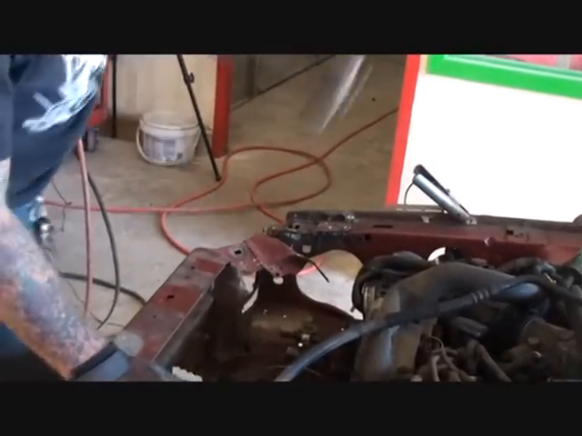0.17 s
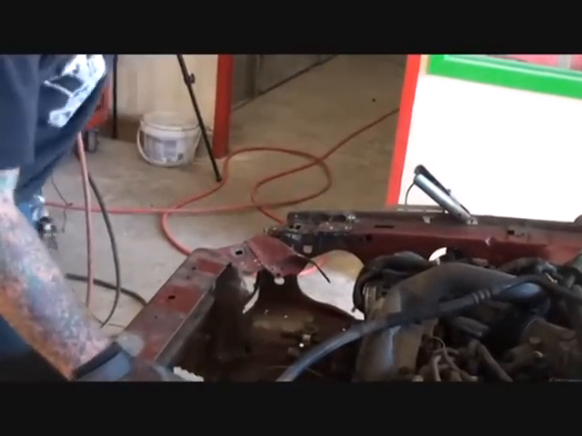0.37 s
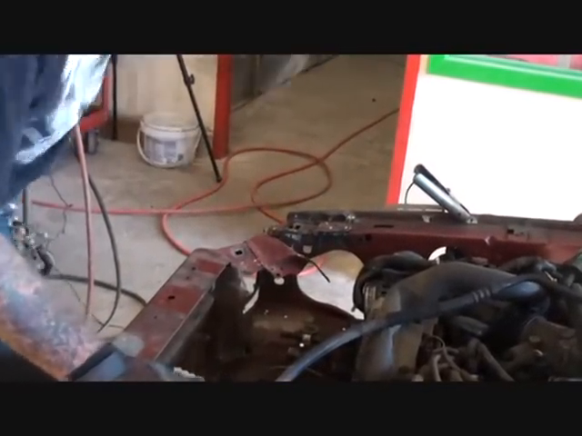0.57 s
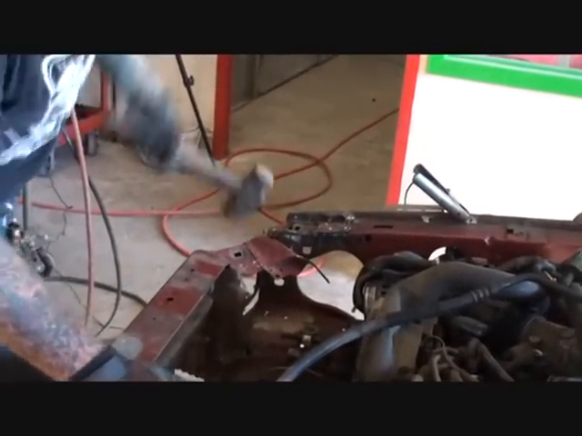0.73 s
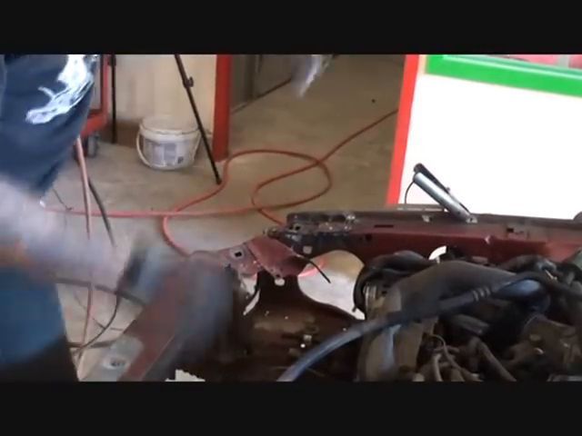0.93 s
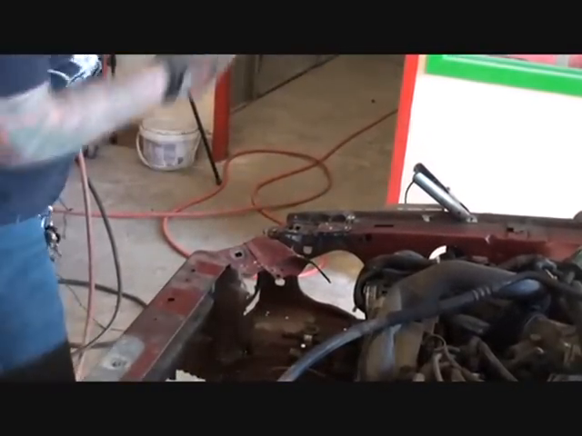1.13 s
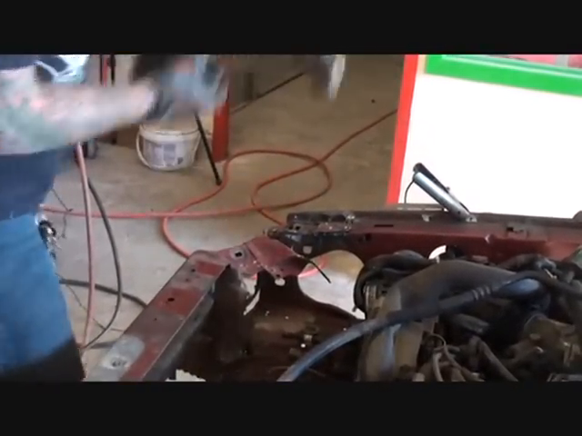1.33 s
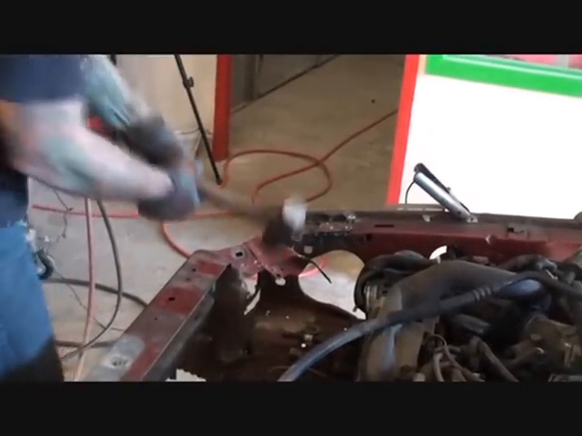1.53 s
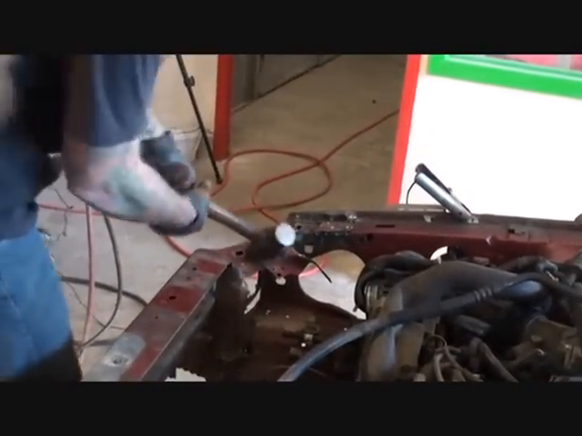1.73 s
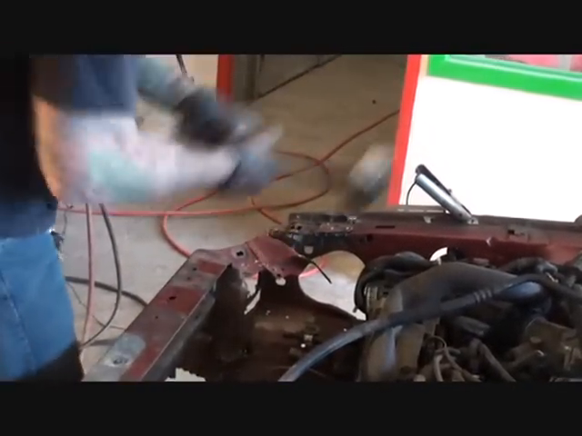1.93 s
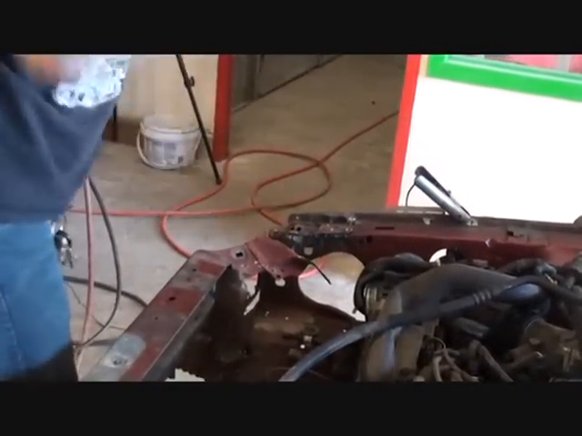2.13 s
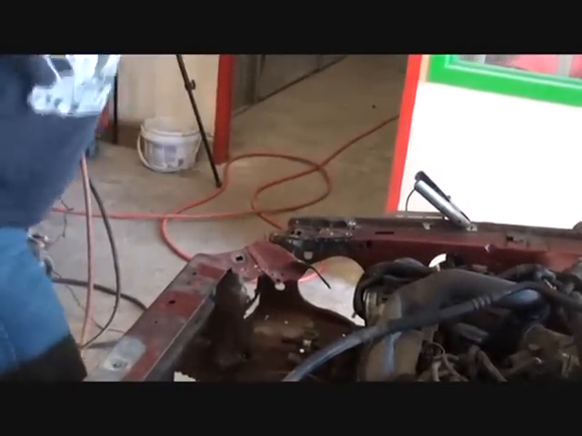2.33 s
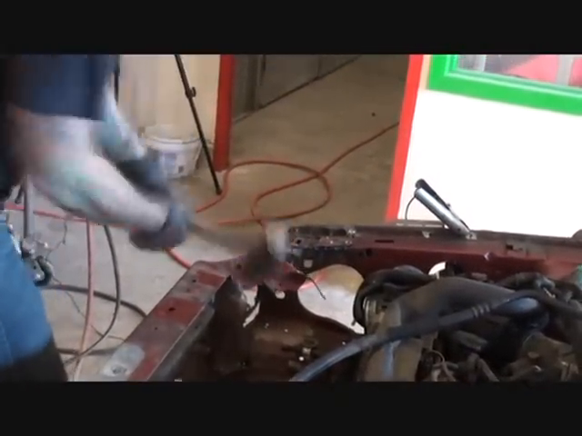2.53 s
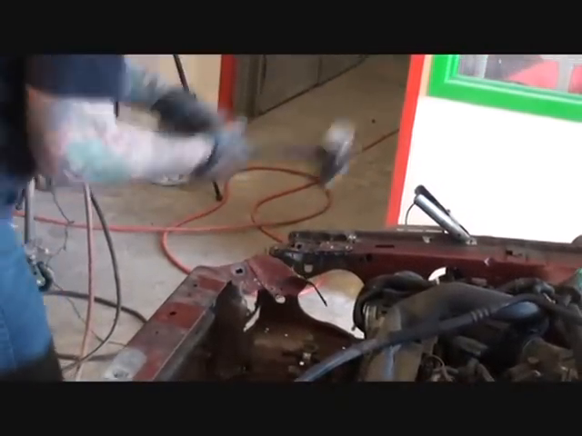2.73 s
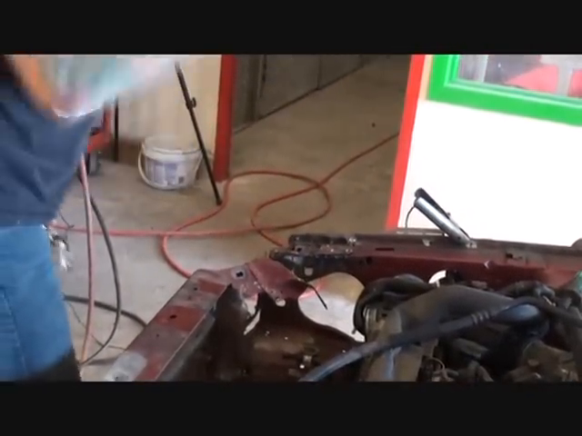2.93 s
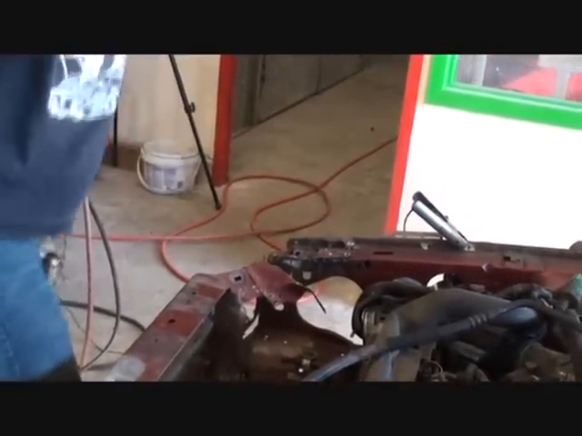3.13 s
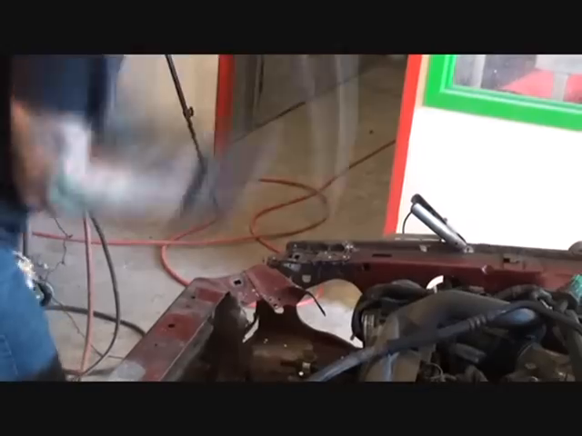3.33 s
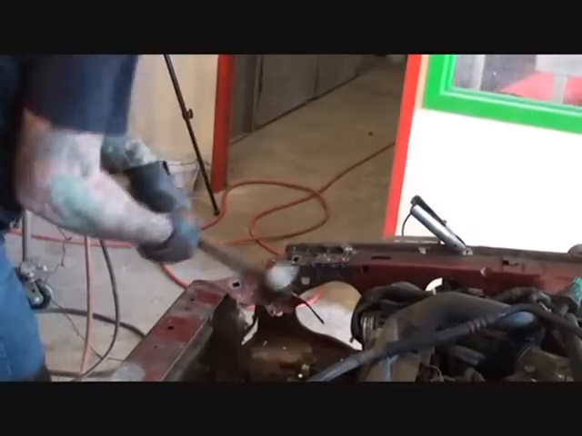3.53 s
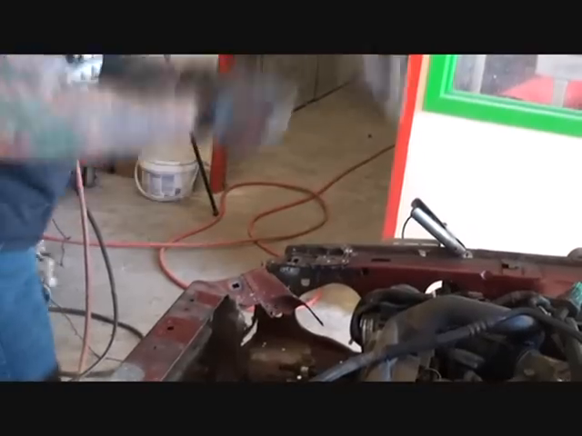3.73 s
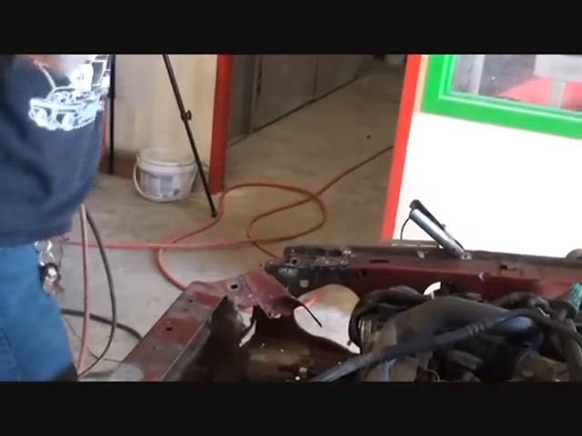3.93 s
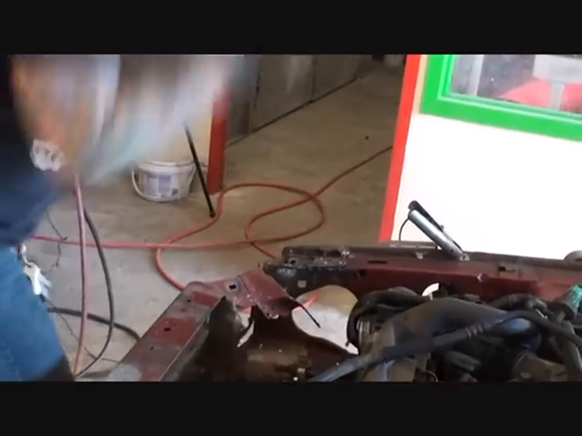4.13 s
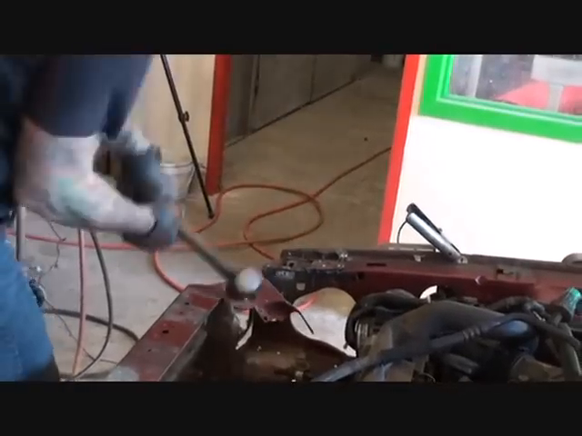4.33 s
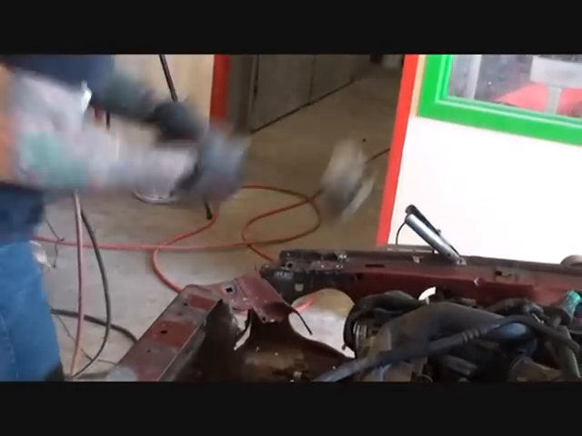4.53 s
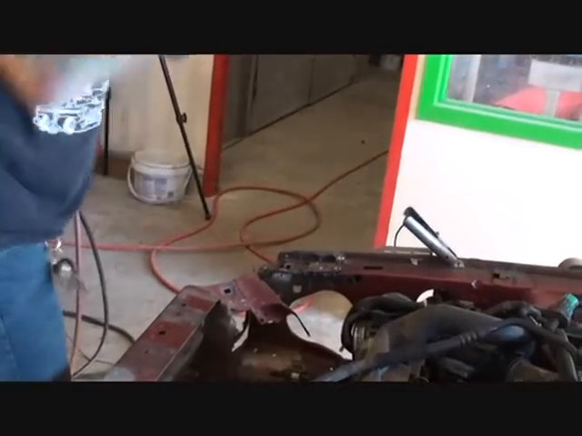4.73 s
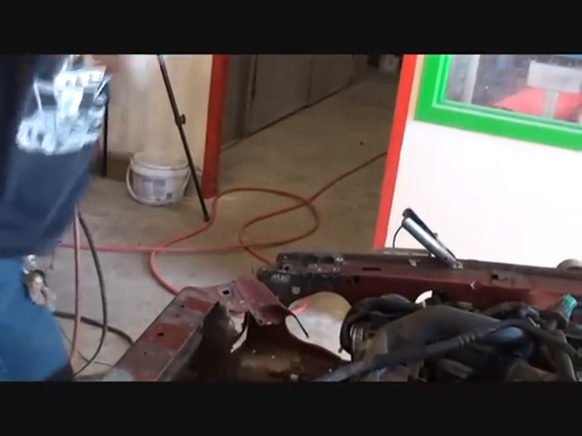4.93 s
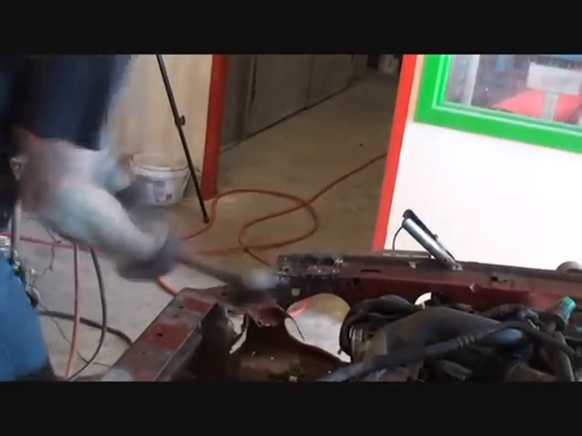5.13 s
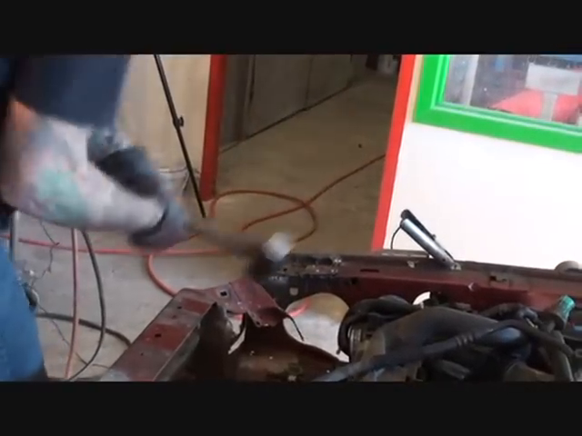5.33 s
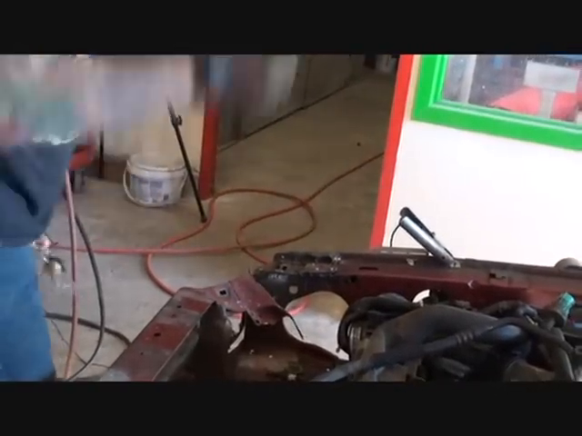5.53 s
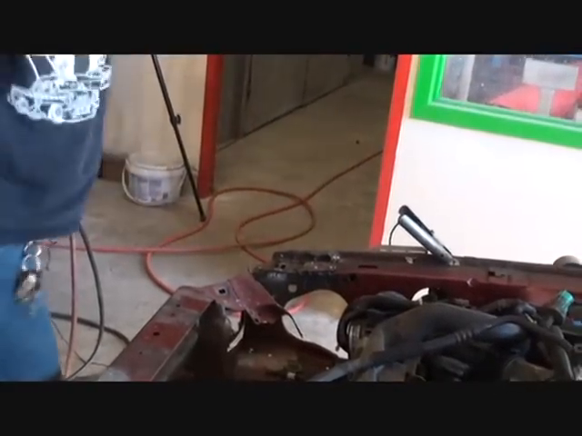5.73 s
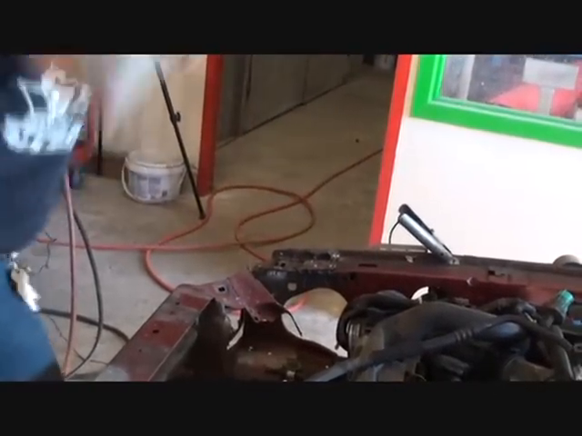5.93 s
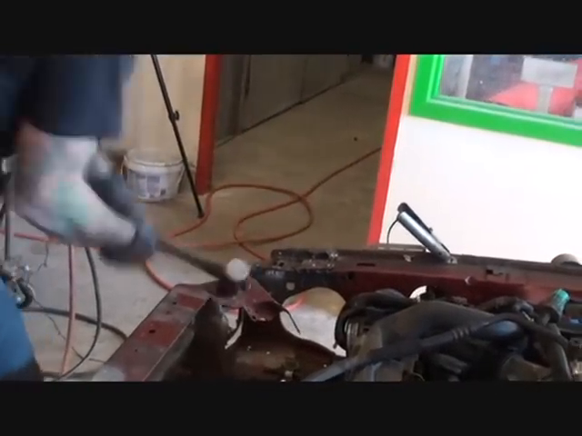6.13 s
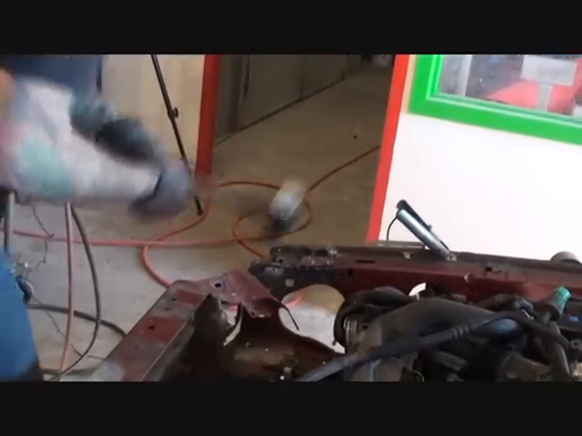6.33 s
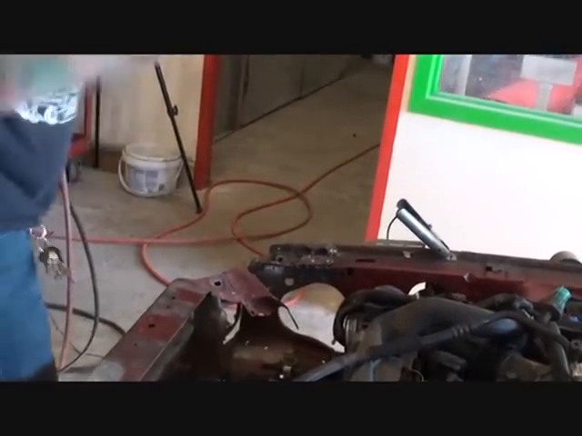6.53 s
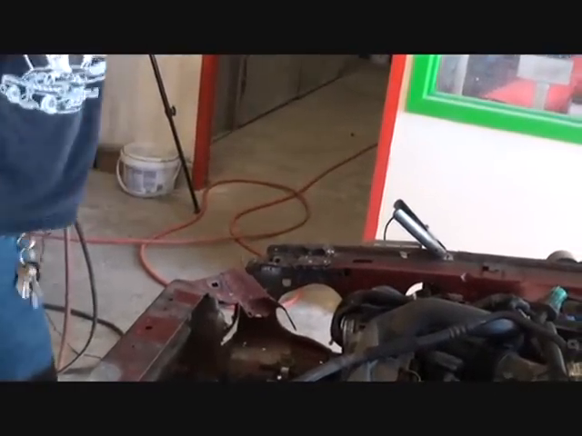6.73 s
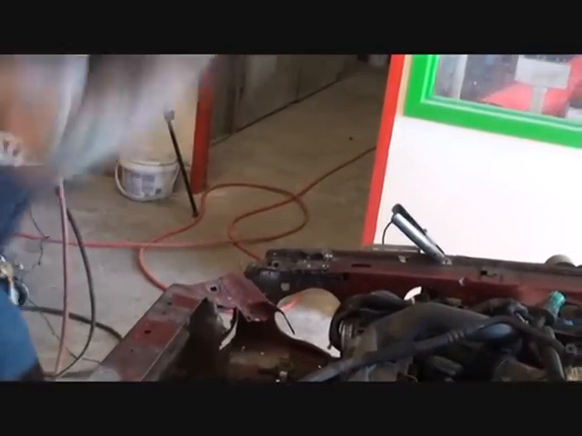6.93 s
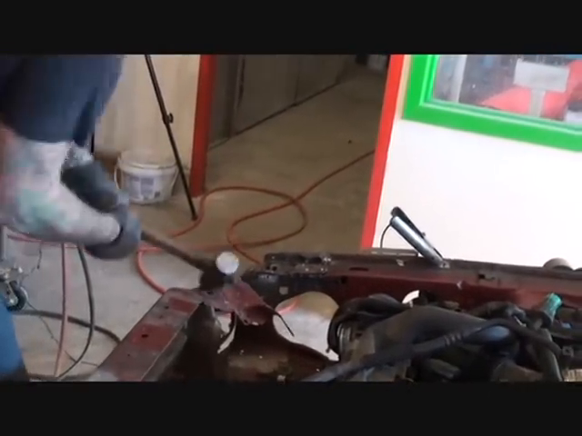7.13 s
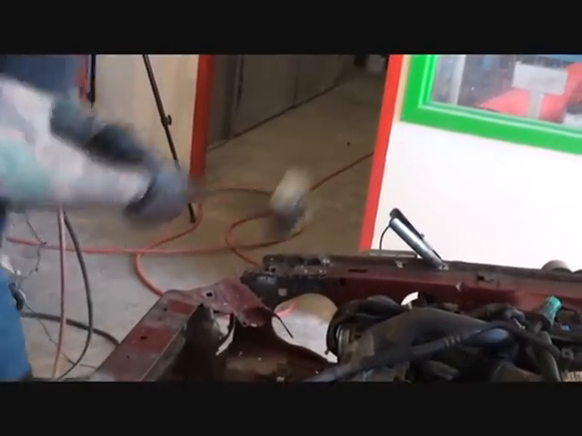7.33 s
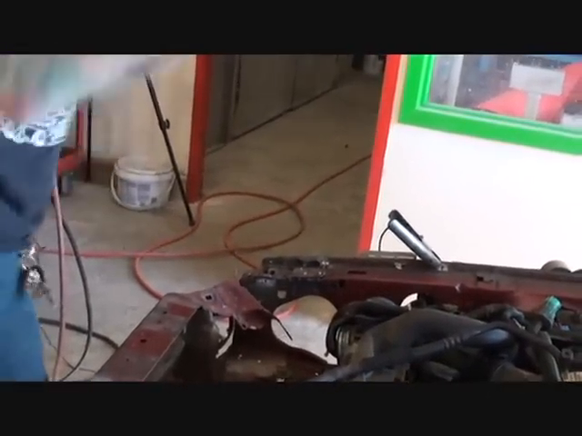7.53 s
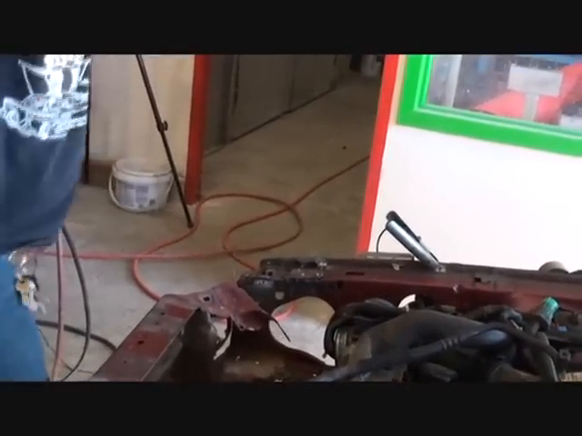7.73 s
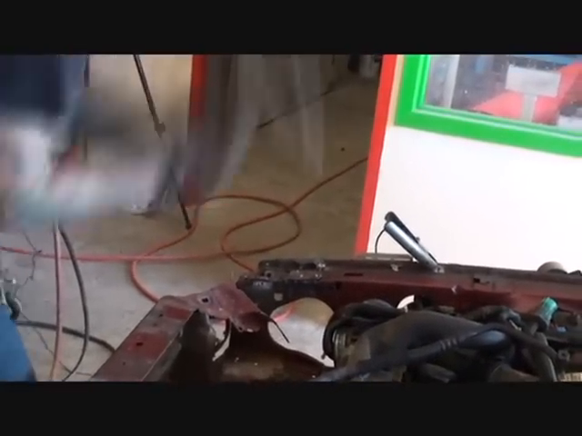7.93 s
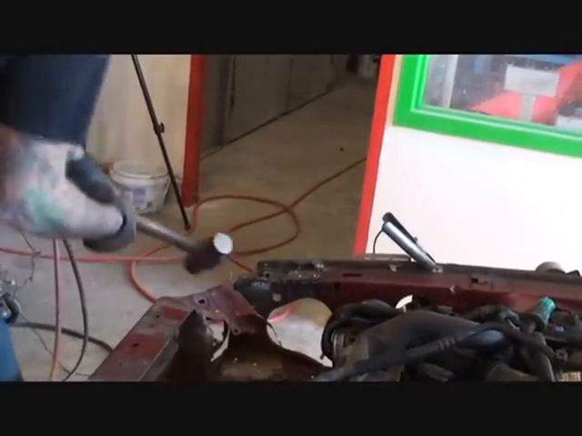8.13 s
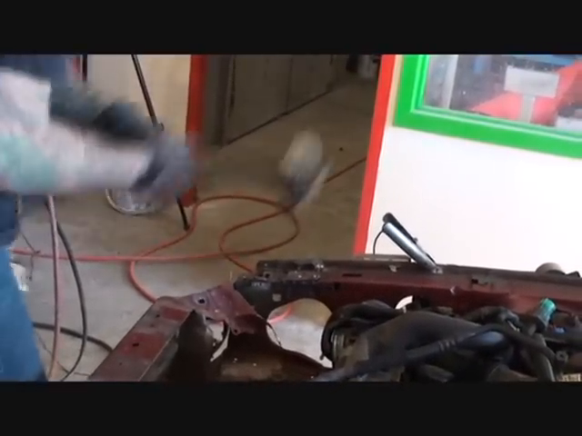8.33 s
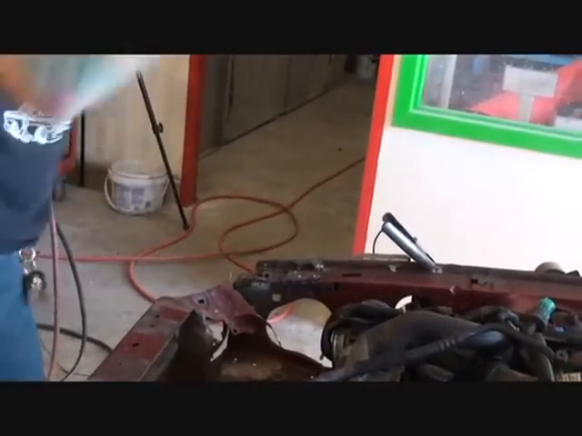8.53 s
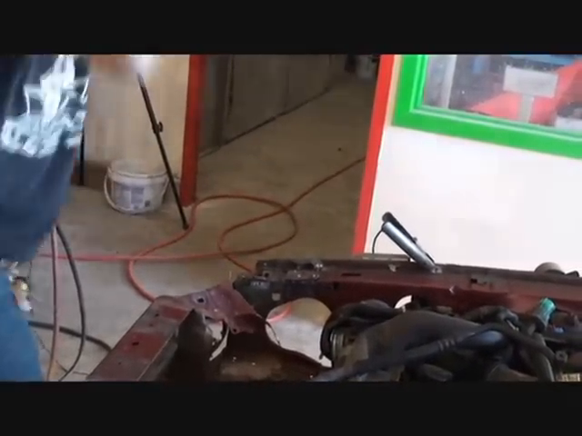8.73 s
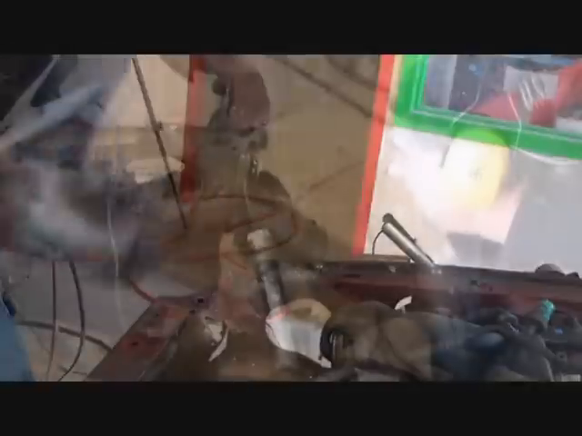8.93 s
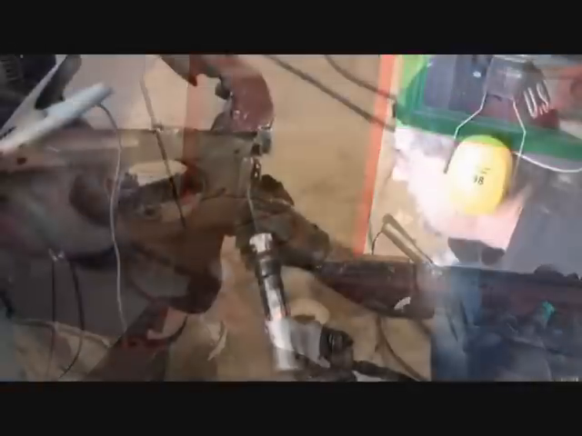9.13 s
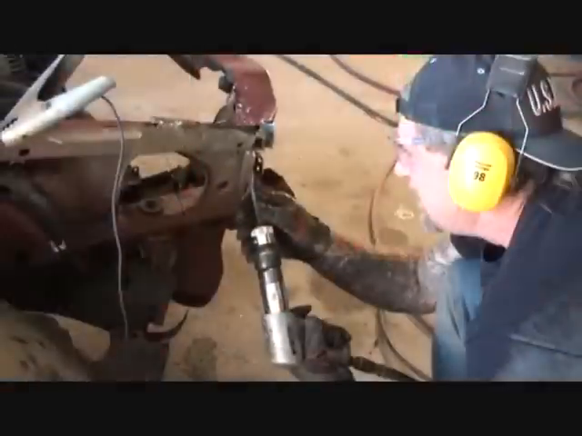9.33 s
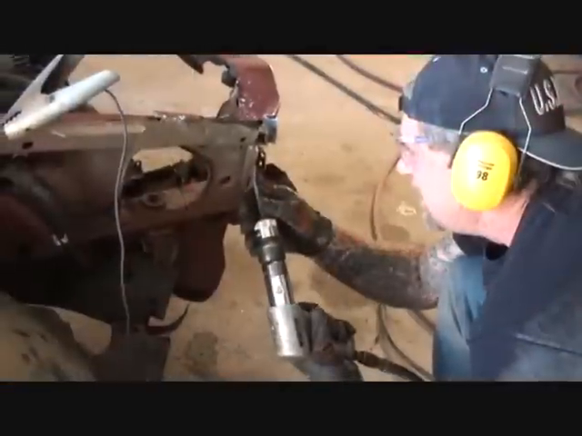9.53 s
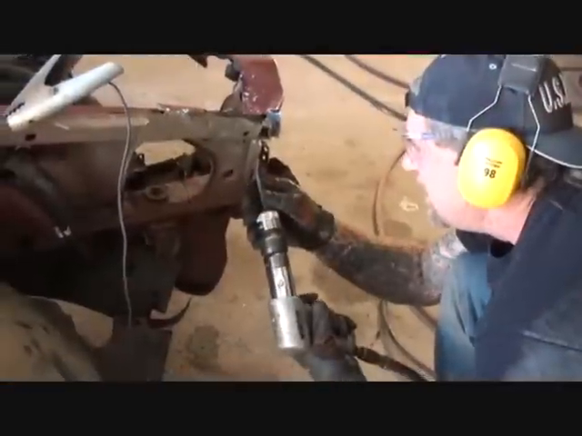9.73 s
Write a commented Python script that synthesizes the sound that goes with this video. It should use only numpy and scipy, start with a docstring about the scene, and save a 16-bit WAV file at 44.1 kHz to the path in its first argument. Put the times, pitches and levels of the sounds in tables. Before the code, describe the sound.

In a hard, reverberant body shop with steady air hiss and faint machine hum, a hand hammer strikes a car's steel front rail ten times, about once a second. Each blow is a bright, clanging crash, heavily compressed, with a short echoing tail; the third is much softer. Light metal ticks fall between. Near the end it dissolves into an air chisel rattling in short bursts.

```python
"""Air hisses and a machine hums throughout a hard, echoing body shop: coloured noise and wavering sines.
A hand hammer strikes a car's sheet-steel front rail ten times: noise crash, low modes and a body thump.
Light metal ticks and faint gliding whines, made of short noise and blurred tones, fall in between.
The scene then dissolves into an air chisel rattling on steel in short bursts of crashes and air puffs.
A limiter flattens the loud blows and strokes into long crashes."""
import sys
import numpy as np
from scipy import signal
from scipy.fft import rfft, irfft
from scipy.io import wavfile
from scipy.ndimage import uniform_filter1d

SR = 44100
rng = np.random.default_rng(int(sys.argv[2]) if len(sys.argv) > 2 else 0)


def generate_wav(sig):
    """Save sig (samples, or channels by samples) to the path in sys.argv[1] as 16-bit PCM at SR."""
    pcm = np.round(np.clip(np.atleast_2d(sig).T, -1, 1) * 32767).astype(np.int16)
    wavfile.write(sys.argv[1], SR, pcm)


N = 436147
TIME = np.arange(N) / SR


def gain_of(db):
    """Amplitude factor of a level in dB."""
    return 10 ** (np.asarray(db) / 20)


def evened(x):
    """Scales a signal to an rms of 1."""
    return x / np.sqrt(np.mean(x ** 2) + 1e-20)


def read(points, hz):
    """Joins (frequency [Hz], value) points on a log-frequency axis."""
    f, value = np.transpose(points)
    return np.interp(np.log(hz + 1), np.log(f + 1), value)


def add(mix, start_s, sound):
    """Lays a sound into the mix, cut off at the end of the mix."""
    part = mix[max(round(start_s * SR), 0):][:len(sound)]
    part += sound[:len(part)]


def noise(colour, size):
    """Noise of rms 1 whose spectrum in dB is the function colour(Hz)."""
    hz = np.fft.rfftfreq(size, 1 / SR)
    white = rfft(rng.standard_normal(size))
    return evened(irfft(white * gain_of(colour(hz)), size))


def blurred_tone(blur, turn):
    """A tone of phase turn whose two quadratures waver with slow noise, which widens it into a band."""
    sine_part = noise(blur, len(turn)) * np.sin(turn)
    cosine_part = noise(blur, len(turn)) * np.cos(turn)
    return sine_part + cosine_part


def drift(rate_hz):
    """Slow random wander of rms 1."""
    return noise(lambda hz: -20 * np.log10(1 + (hz / rate_hz) ** 4), N)


def shop():
    """Slowly swelling air and fan noise with machine hum, each hum tone wavering in level and pitch."""
    # background of air hiss and fans: (frequency [Hz], density [dB per Hz])
    hiss_colour = [(25, -28), (70, -11.5), (200, -6), (350, -5.5), (520, 2.5), (1500, -2.5), (2800, 0.5),
                   (5000, -2.5), (7700, -4), (10300, -2.5), (12500, -13), (14000, -15), (15600, -14.5)]
    # machine hum: (frequency [Hz], level [dB])
    hum_tones = [(484.5, -55.5), (1131, -56.5), (1460, -62)]
    # swell of the whole background: (time [s], level [dB])
    swell = [(0, 2.5), (1.4, 0), (2.1, 2.5), (5.0, 2), (6.0, 0.6), (8.7, -0.6)]
    hiss_level_db = -41.5 + 0.18 * drift(3.4)
    hiss = gain_of(hiss_level_db) * noise(lambda hz: read(hiss_colour, hz), N)
    hum = np.zeros(N)
    for hz, db in hum_tones:
        level = gain_of(db + 2.1 * drift(2.7))
        wavering_hz = hz + 2.2 * drift(15)
        hum += level * np.sin(2 * np.pi * np.cumsum(wavering_hz) / SR)
    swell_db = np.interp(TIME, *np.transpose(swell))
    return gain_of(swell_db) * (hiss + np.sqrt(2) * hum)  # root 2 turns rms into sine peak


def fine_modes(depth_db, spacing_hz):
    """A slightly uneven, fine-grained ringing colour, drawn at random: a function from Hz to dB."""
    lifts = depth_db * rng.standard_normal(2048)
    return lambda hz: np.interp(hz, spacing_hz * np.arange(len(lifts)), lifts)


def steel(spectrum, peaks, hz):
    """A broad colour with resonances standing on it, in dB."""
    lift = sum(db / (1 + (2 * (hz - f) / width) ** 2) for f, width, db in peaks)
    return read(spectrum, hz) + lift


def crash(colour, length, crack_db, crack_s, late_db, late_t60):
    """One impact: a bright crack, countless modes and echoes whose top treble dies first, a faint late tail."""
    # dying away of steel and shop together, before the length factor: (frequency [Hz], t60 [s])
    decay_times = [(60, 0.69), (250, 0.63), (600, 0.6), (1200, 0.69), (2800, 0.73), (5000, 0.64),
                   (7500, 0.5), (10000, 0.44), (15000, 0.39)]
    t = TIME[:2 ** 16]
    hz, at, z = signal.stft(noise(colour, len(t)), SR, nperseg=512)
    t60 = np.maximum(read(decay_times, hz)[:, None] * length, .01)
    early = gain_of(-60 * at / t60)
    late = gain_of(late_db - 60 * at / (t60 * late_t60))  # late_t60 is a multiple of the early t60
    z *= np.hypot(early, late)
    ring = signal.istft(z, SR, nperseg=512)[1][:len(t)]
    # short bending waves run fastest in a sheet, so the treble arrives before the body builds up
    crack = noise(lambda f: colour(f) - 10 * np.log10(1 + (3800 / (f + 1)) ** 4), 4096)
    ring *= 1 - np.exp(-t / 0.0058)
    add(ring, 0, gain_of(crack_db) * crack * np.exp(-t[:len(crack)] / crack_s))
    return ring * np.minimum(t / .0025, 1) ** 2


def clank():
    """The rail's low modes, set ringing together; the shop's echoes make each one waver."""
    # modes that clank under a blunt blow: (frequency [Hz], level [dB], t60 [s])
    modes = [(451, -16, 0.39), (622, -20, 0.37), (813, -5, 0.34), (937, 0, .26), (968, -5, 0.31),
             (1000, -2, 0.49), (1060, -12, 0.49), (1070, -3, 0.4), (1260, -16, 0.51), (1530, -21, .4),
             (2140, -7, 0.41), (2860, -11.5, 0.45), (3400, -18, .45), (4170, -16, 0.71)]
    t = TIME[:SR]
    blur = lambda hz: -20 * np.log10(1 + (hz / 22) ** 2)
    ring = np.zeros(len(t))
    for hz, db, t60 in modes:
        ring += gain_of(db - 60 * t / t60) * blurred_tone(blur, 2 * np.pi * hz * t)
    return ring / np.sqrt(2) * (1 - np.exp(-t / 0.0091))


def thump():
    """The whole car body gives under a blow: a short burst of low noise."""
    t = TIME[:SR // 2]
    colour = lambda hz: -20 * np.log10((1 + (hz / 130) ** 2) * (1 + (25 / (hz + 1)) ** 2))
    return noise(colour, len(t)) * np.exp(-t / 0.04) * np.minimum(t / 0.0047, 1)


def hammer():
    """Each blow crashes, clanks and thumps; loose metal ticks now and then."""
    # hammer blows: (time [s], force [dB], ring length [factor], thump [dB relative to the force])
    blows = [(.016, 7.5, 0.93, -45), (.774, 9, .95, -36), (1.768, -13, 0.93, -44), (2.661, 9, 1.01, -36),
             (3.504, 8.5, 0.94, -45), (4.367, 8, 0.97, -41), (5.265, 7.5, 1.05, -38),
             (6.214, 10.5, 0.96, -35), (7.169, 10.5, 0.95, -30), (8.126, 7, 1.01, -37)]
    # light metal ticks between blows: (time [s], level [dB])
    ticks = [(.385, -36), (3.062, -29), (3.79, -30), (6.546, -25.5), (8.429, -35)]
    # colour of the struck rail: (frequency [Hz], density [dB per Hz])
    rail_colour = [(40, -58), (120, -31), (200, -16.5), (350, -11), (600, 0), (1000, 4), (2000, 0.5),
                   (2900, -2.5), (4000, -1.5), (7000, -7), (10000, -15), (12500, -23.5), (16000, -36)]
    # resonances that stand out of its dense ringing: (frequency [Hz], width [Hz], lift [dB])
    rail_peaks = [(294, 19, 4), (442, 34, 4), (570, 35, 3.5), (810, 46, 1), (920, 18, 2.5), (1090, 19, 0),
                  (1260, 43, 0), (2710, 180, 4), (3040, 390, 3.5), (4810, 450, 0.5), (6970, 170, 4.5)]
    # a harder blow is brighter: tilt at a force of 0 dB, and its rise with every dB of force
    tilt_db_per_octave, tilt_per_force_db = -0.6, 0.1256
    # the low modes clank about equally at every blow, so they stand out under a soft one
    clank_db = -11
    out = np.zeros(N)
    for s, force_db, length, thump_db in blows:
        grain = fine_modes(depth_db=1.12, spacing_hz=30.0)  # drawn anew for every blow
        tilt = tilt_db_per_octave + tilt_per_force_db * force_db
        colour = lambda hz: steel(rail_colour, rail_peaks, hz) + tilt * np.log2((hz + 200) / 2000) + grain(hz)
        impact = crash(colour, length, crack_db=0.0, crack_s=0.0064, late_db=-26.5, late_t60=2.09)
        add(out, s, gain_of(force_db) * impact)
        add(out, s, gain_of(clank_db) * clank())
        add(out, s, gain_of(force_db + thump_db) * thump())
    for s, db in ticks:
        colour = lambda hz: -12 * np.log2((hz + 1) / 6500) ** 2
        tick = crash(colour, 0.41, crack_db=3, crack_s=.006, late_db=-30, late_t60=1.2)
        add(out, s, gain_of(db) * tick)
    return out


def whines():
    """Faint thin whines: narrow bands that arch in pitch, blurred by the shop's echo."""
    # (start [s], length [s], start pitch [Hz], middle pitch [Hz], end pitch [Hz], level [dB])
    glides = [(0.502, 0.32, 4330, 5170, 4850, -46), (3.08, 0.24, 4850, 4600, 4050, -47),
              (4.599, .52, 1560, 1530, 1302, -41.5), (5.064, 0.39, 4300, 4640, 4800, -45)]
    blur = lambda f: -20 * np.log10(1 + (f / 100) ** 2)
    out = np.zeros(N)
    for s, length, first, middle, last, db in glides:
        u = np.linspace(0, 1, int(length * SR))
        hz = np.polyval(np.polyfit([0, .5, 1], [first, middle, last], 2), u)
        tone = blurred_tone(blur, 2 * np.pi * np.cumsum(hz) / SR)
        add(out, s, gain_of(db) * tone * signal.windows.tukey(len(u), .5))
    return out


def strokes(start, stop, rate, force_db):
    """The strokes of one trigger pull, as rows (time [s], force [dB])."""
    spin_up_s = .0045  # the time that the piston loses in getting up to speed
    # the first stroke has the full pressure of the hose behind it; then the pressure sags
    kick_db, sag_db_per_s = 1, 19
    k = np.arange(np.ceil((stop - start) * rate))
    since = k / rate + spin_up_s * (1 - np.exp(-k))
    return zip(start + since, force_db + kick_db * (k == 0) - sag_db_per_s * since)


def chisel():
    """The piston strikes one spot many times a second; after each stroke the exhaust puffs out air."""
    # trigger pulls: (start [s], stop [s], stroke rate [per second], force [dB])
    bursts = [(8.854, 9.011, 31.5, -14), (9.084, 9.31, 41, -6.5), (9.495, 9.74, 39, -5),
              (9.845, 9.85, 39, -18.5), (9.866, 9.89, 39, -10.5)]
    # colour of the chiselled panel: (frequency [Hz], density [dB per Hz])
    panel_colour = [(40, -32), (150, -24.5), (250, -12.5), (500, -2.3), (1100, 2.5), (1800, 0), (2700, 0),
                    (5000, -2), (7000, -6), (10000, -11), (13000, -19), (16000, -20)]
    # resonances that stand out of its dense ringing: (frequency [Hz], width [Hz], lift [dB])
    panel_peaks = [(293, 29, 7), (400, 28, 4.5), (590, 76, 5), (1040, 40, 0.5), (1234, 97, 4.5),
                   (1530, 40, 2), (2160, 110, 3.5), (2680, 160, 4.5), (3170, 120, 3), (5350, 120, 3),
                   (5600, 80, 1), (6940, 120, 4)]
    out, t = np.zeros(N), TIME[:SR // 8]
    grain = fine_modes(depth_db=1.6, spacing_hz=22.3)  # one draw, shared by all strokes and puffs
    colour = lambda hz: steel(panel_colour, panel_peaks, hz) + grain(hz)
    puff_colour = lambda hz: grain(hz) - 10 * np.log10(1 + (7000 / (hz + 1)) ** 4)
    for burst in bursts:
        for s, force_db in strokes(*burst):
            size = gain_of(force_db + 2.4 * rng.standard_normal())  # no two strokes are equally hard
            impact = crash(colour, 1.0, crack_db=1.0, crack_s=0.0074, late_db=-19, late_t60=2.0)
            add(out, s, size * impact)
            puff = noise(puff_colour, len(t)) * np.exp(-t / 0.0056)
            add(out, s + 0.0026, size * gain_of(-7) * puff)
    return out


def limit(x, ceiling_db=-8.5, recovery_db_per_s=110):
    """A limiter: clamps power above the ceiling almost at once, then lets go at a steady rate in dB."""
    power_db = 10 * np.log10(abs(uniform_filter1d(x ** 2, size=200)) + 1e-12)
    fall = TIME * recovery_db_per_s
    held_db = np.maximum.accumulate(power_db + fall) - fall  # peaks held, sinking at the recovery rate
    over_db = np.maximum(held_db - ceiling_db, 0)
    return x / gain_of(uniform_filter1d(over_db, size=60))


def scene():
    """Two limited scenes, the second dissolving in over the first; both channels alike."""
    # the chisel scene fades in quickly at first, then settles towards its full share
    dissolve_start_s, dissolve_s, chisel_share = 8.82, 0.36, 0.89
    share = np.clip(chisel_share * np.tanh((TIME - dissolve_start_s) / dissolve_s), 0, 1)
    background = shop()
    hammer_scene = limit(hammer() + whines() + background)
    chisel_scene = limit(chisel() + background)
    mono = (1 - share) * hammer_scene + share * chisel_scene
    return np.array([mono, mono])


def record(dry):
    """Rounds off the highest peaks, then cuts the treble above the band edge."""
    edge_hz = 15850
    rounded = dry / (1 + (dry / .97) ** 6) ** (1 / 6)
    lowpass = signal.firwin(511, edge_hz, window=("kaiser", 9), fs=SR)
    return signal.oaconvolve(rounded, lowpass[None], "same")


dry = scene()
out = record(dry)
generate_wav(out)
```